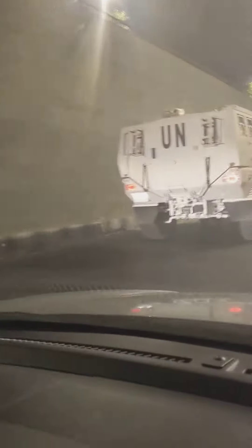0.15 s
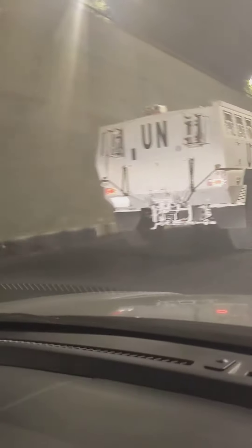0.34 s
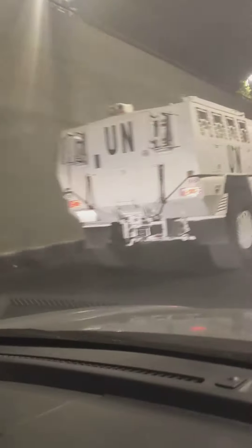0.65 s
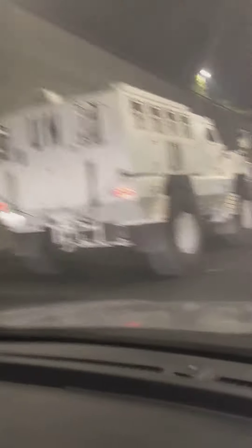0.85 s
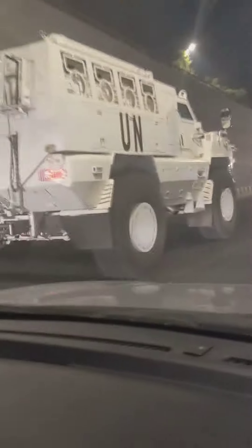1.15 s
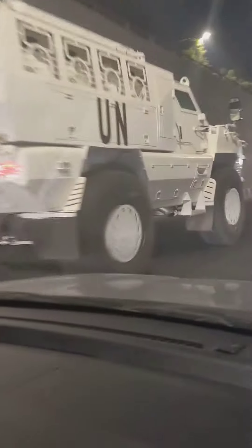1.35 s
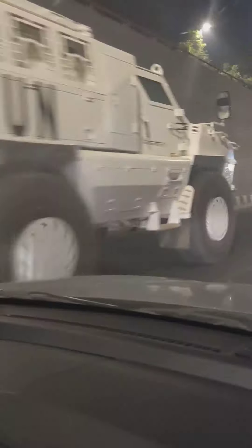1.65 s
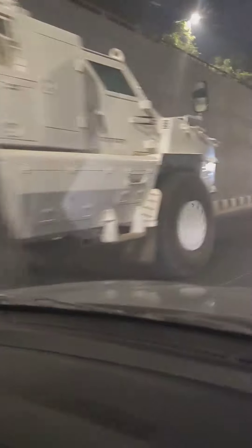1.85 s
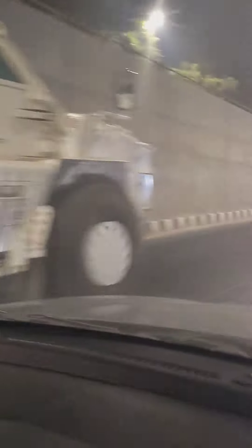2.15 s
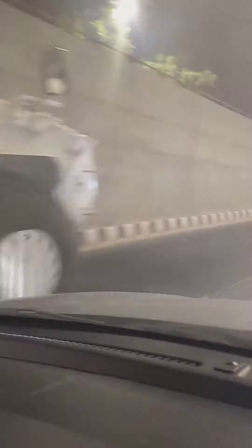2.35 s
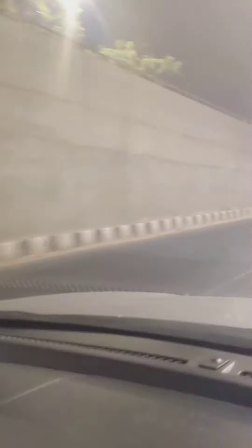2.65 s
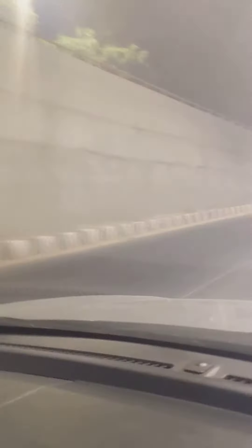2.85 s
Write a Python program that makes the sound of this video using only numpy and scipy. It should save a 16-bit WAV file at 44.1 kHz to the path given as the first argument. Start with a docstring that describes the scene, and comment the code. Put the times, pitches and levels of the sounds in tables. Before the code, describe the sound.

Inside a car at night, steady bass-heavy road and tyre noise with a faint rising engine hum; small camera clicks and rubs, soft thuds, then brief faint squeals beside an overtaken truck, louder in the right channel.

```python
"""A low rumble and a wavering cabin boom, under tyre roar and hiss, inside a car that overtakes a truck.
Shaped noise makes the rumble and tyres; wandering tones make the boom, shudder and rising engine hum.
Decaying sines make bumps thud. A hand on the camera clicks, knocks, rubs and rustles in bursts of noise.
Narrow noise makes the truck's falling hiss and thin sizzles; short tones squeal. The left port is weak."""
import sys
import numpy as np
from scipy.fft import rfft, irfft, next_fast_len
from scipy.io import wavfile
from scipy.ndimage import uniform_filter1d, map_coordinates

SR = 44100
rng = np.random.default_rng(int(sys.argv[2]) if len(sys.argv) > 2 else 0)


def pcm_store(signal):
    """Save signal as 16-bit PCM."""
    levels = np.round(np.clip(np.atleast_2d(signal), -1, 1) * 32767)
    wavfile.write(sys.argv[1], SR, levels.astype(np.int16).T)


N = 131859

# handling clicks: t/s, relative click level/dB, relative knock level/dB, click t60/s
CLICK_EVENTS = [(0.238,-51.5,-37.5,.025),(.2597,-46.5,-45,0.04),(0.2653,-54,-42,0.028),(0.2763,-48.5,-44,0.019),(0.3118,-57,-36.5,.025),(.3178,-38.5,-37.5,.025),(0.3228,-53.5,-37,0.034),(0.3588,-49,-39,.017),(0.859,-62.5,-44.5,.02),(0.8716,-61,-46,0.018),(0.8995,-67,-38.5,.028),(1.6217,-50,-41,0.014),(2.186,-63,-42,0.023),(2.2317,-57,-50,0.018),(2.2464,-45.5,-38.5,0.057),(2.278,-59,-38,.045),(2.762,-53.5,-57,.015),(2.8111,-48,-41,.029)]


def amp(db):
    """Decibels to gain."""
    return 10 ** (np.asarray(db) / 20)


def unit(x):
    """Scale to rms 1."""
    return x / np.sqrt(np.mean(x ** 2) + 1e-20)


def along(points, hz):
    """Read (f/Hz, value) points on a log frequency axis."""
    f, v = np.transpose(points)
    return np.interp(np.log(hz + 1), np.log(f + 1), v)


def curves(rows):
    """One value per sample for each column after the time."""
    s, *cols = np.transpose(rows)
    return [np.interp(np.arange(N) / SR, s, c) for c in cols]


def wobble(rate):
    """A smooth random curve, with rate knots a second."""
    knots = rng.standard_normal(int(N * rate / SR) + 4)
    return map_coordinates(knots, [np.arange(N) * rate / SR], mode="nearest")


def filtered(x, response):
    """Filter x by a complex response of frequency."""
    m = next_fast_len(N + SR // 2)
    hz = np.fft.rfftfreq(m, 1 / SR)
    return irfft(rfft(x, m) * response(hz), m)[..., :N]


def noise(spectrum):
    """Two unrelated noises of rms 1, rolled off around an octave above the last point of their spectrum."""
    m = next_fast_len(N + SR // 4)
    hz = np.fft.rfftfreq(m, 1 / SR)
    gain = amp(along(spectrum, hz)) / (1 + (hz / spectrum[-1][0] / 2) ** 10)
    shaped = irfft(rfft(rng.standard_normal((2, m))) * gain, m)[:, :N]
    return np.array([unit(n) for n in shaped])


def evened(x, span_s):
    """Noise with its slow chance swells taken out."""
    power = uniform_filter1d(x ** 2, max(int(span_s * SR), 2), axis=-1)
    return x / np.sqrt(np.abs(power) + 1e-9)


def burst(start, attack_s, t60):
    """A straight rise, then an exponential fall of 60 dB in t60 seconds."""
    t = np.arange(N) / SR - start
    return np.clip(t / attack_s, 0, 1) * 1000 ** (-np.maximum(t - attack_s, 0) / t60)


def swell(start, length):
    """A half-sine rise and fall."""
    t = np.arange(N) / SR
    return np.sin(np.pi * np.clip((t - start) / length, 0, 1))


def ringing(hz, wander_hz):
    """A resonance kept going: a tone of rms 1 that wanders in pitch and flutters in level."""
    flutter_db = 1.46
    phase = 2 * np.pi * np.cumsum(hz + wander_hz * wobble(16)) / SR
    return unit(np.sin(phase) * amp(flutter_db * wobble(16)))


def narrow(hz, width_hz):
    """A narrow band of noise around a centre that may move: two random curves on a carrier."""
    phase = 2 * np.pi * np.cumsum(hz * np.ones(N)) / SR
    return unit(wobble(2 * width_hz) * np.cos(phase) + wobble(2 * width_hz) * np.sin(phase))


def rumble():
    """The road shakes the body into a low, steady-grained noise."""
    # t/s, relative level/dB
    rumble_level = [(0,-28.5),(.4,-29),(.7,-31.5),(.85,-27),(2.0,-28),(2.99,-25.5)]
    # f/Hz, relative density/dB
    rumble_spectrum = [(15, -48.5), (24, -31.5), (30, -16), (38, -6), (48, 1.5), (59, -1), (68, -1),
                       (90, -4.5), (200, -59.5)]
    level_db, = curves(rumble_level)
    return amp(level_db + 0.5) * evened(noise(rumble_spectrum), span_s=0.13)


def cabin_boom():
    """The road pumps the cabin's lowest air resonance: a wandering tone in a bed of narrow noise."""
    # t/s, relative level/dB
    boom_level = [(0,-11),(.08,-22.5),(.14,-15),(.21,-22.5),(.26,-13.5),(.31,-22),(.36,-12.5),(.45,-14.5),(.54,-13.5),(.62,-18.5),(.69,-24),(.78,-22.5),(.93,-27.5),(1.06,-20.5),(1.31,-34),(1.41,-18),(1.52,-19.5),(1.66,-29.5),(1.83,-19),(1.94,-24.5),(2.07,-18),(2.18,-30.5),(2.52,-23.5),(2.99,-27)]
    # t/s, mean pitch f/Hz
    boom_pitch = [(0,78.14),(.2,79.5),(.32,75),(.6,75.63),(.8,80.33),(1.2,75.9),(1.9,79.46),(2.2,77),(2.6,83),(2.99,75.96)]
    # f/Hz, relative density/dB
    boom_spectrum = [(50, -43.5), (69, -0.5), (75, -5), (82, -2.5), (90, -10.5), (120, -53.5)]
    tone_db, bed_db, wander_hz = -3.5, -12, 1.6
    level_db, = curves(boom_level)
    pitch_hz, = curves(boom_pitch)
    boom = amp(bed_db) * evened(noise(boom_spectrum), span_s=0.04)
    boom[0] += amp(tone_db) * ringing(pitch_hz, wander_hz)
    return amp(level_db) * boom


def shudder():
    """The road shakes the body in a deep tone of drifting pitch and surging level."""
    # t/s, mean pitch f/Hz, relative level/dB
    shudder_path = [(0,60.1,-39.5),(.12,56.93,-17.5),(.22,58.01,-34),(.68,57.14,-31),(.84,57.82,-23),(1.0,60.8,-27.5),(1.2,58.96,-22),(1.32,54.95,-25.5),(1.48,52.18,-32.5),(1.66,50.23,-22),(1.78,54.64,-30.5),(1.9,58,-19.5),(2.0,55.2,-31.5),(2.3,57.01,-27.5),(2.45,59.83,-23.5),(2.6,59.33,-19.5),(2.74,61.3,-22),(2.81,56.6,-26.5),(2.88,56.6,-26.5),(2.99,60.3,-13.5)]
    pitch_hz, level_db = curves(shudder_path)
    return amp(level_db - 1) * ringing(pitch_hz, wander_hz=1.5)


def bumps():
    """Bumps in the road thud as decaying sines with a soft onset."""
    # t/s, relative level/dB, thud f/Hz, t60/s
    bump_events = [(.245,-20,146.3,.2),(.675,-26.5,149,.3),(1.548,-22,114.8,0.44),(1.998,-15,112.5,0.43),(2.228,-20,113.8,0.18),(2.494,-20,155.2,0.21),(2.68,-21,120.3,0.12)]
    attack_s = 0.019
    t = np.arange(N) / SR
    thuds = np.zeros(N)
    for start, db, f, t60 in bump_events:
        thuds += amp(db) * burst(start, attack_s, t60) * np.sin(2 * np.pi * f * (t - start))
    return thuds


def tyres():
    """Drone, roar and hiss in three noise bands; the road's texture shakes roar and hiss together."""
    # t/s, relative drone level/dB, relative roar level/dB, relative hiss level/dB
    tyre_levels = [(0,-19.5,-33.5,-45.5),(.15,-31,-33.5,-44.5),(.3,-25,-31.5,-44),(.55,-28.5,-37,-47),(1.0,-26,-37,-45.5),(1.5,-27,-35,-45.5),(1.85,-27,-37.5,-45),(2.08,-27.5,-35,-45.5),(2.22,-26.5,-31.5,-44.5),(2.4,-25.5,-34.5,-45.5),(2.55,-23,-32.5,-44.5),(2.8,-24.5,-33.5,-44.5),(2.95,-27,-36,-44)]
    # three spectra: f/Hz, relative density/dB
    drone_spectrum = [(60, -40), (90, 0.5), (112, 0), (135, 1), (153, -1.5), (178, -3.5), (215, -7),
                      (250, -13), (340, -50.5)]
    roar_spectrum = [(170, -25.5), (250, 0.5), (300, 1), (365, -4.5), (430, -3.5), (520, -10.5), (620, -14),
                     (760, -23.5), (1200, -54.5)]
    hiss_spectrum = [(400, -28), (680, 1.5), (800, 2), (950, 2), (1350, -3), (1650, -2.5), (2300, -9),
                     (3050, -13.5), (3600, -20), (4200, -20.5), (5000, -27.5), (6800, -28.5), (7600, -33),
                     (8400, -34.5), (11000, -42.5), (15500, -43.5)]
    drone_db, roar_db, hiss_db = curves(tyre_levels)
    texture = wobble(30.19)
    drone = amp(drone_db - 0.5) * evened(noise(drone_spectrum), span_s=0.36)
    # each band also has a slower tremble of its own
    roar = amp(roar_db + 0.96 * texture + 0.3 * wobble(12)) * noise(roar_spectrum)
    hiss = amp(hiss_db + 0.9 * texture + 0.35 * wobble(12)) * noise(hiss_spectrum)
    return drone + roar + hiss


def engine():
    """A slightly unsteady hum on harmonics of the firing rate, which climbs as the car gathers speed."""
    # t/s, mean firing rate f/Hz, relative level/dB
    engine_path = [(0, 63.3, -43), (.5, 64.62, -33), (1.1, 66.55, -32.5), (1.85, 68.46, -34),
                   (2.4, 68.98, -36.5), (3, 70.1, -38)]
    # multiple of the firing rate, mean relative level/dB
    engine_orders = [(2, -9.5), (3, -1)]
    rate_hz, level_db = curves(engine_path)
    phase = 2 * np.pi * np.cumsum(rate_hz + 0.14 * wobble(10)) / SR
    hum = np.zeros(N)
    for order, db in engine_orders:
        hum += amp(db + 2.4 * wobble(11)) * unit(np.sin(round(order) * phase))
    return amp(level_db) * hum


def rubs_and_rustles():
    """Fingers rub and the grip rustles: bursts and swells of grainy treble noise."""
    # rubs: start t/s, relative level/dB, attack/s, t60/s
    rub_events = [(.292,-53,.015,0.14),(.46,-65,.06,.5),(.816,-54,0.01,.2),(1.168,-59,.01,.23),(1.686,-55,0.012,0.16)]
    # rustles: centre t/s, half length/s (the spread of a bell curve), relative level/dB
    rustle_events = [(0.198, 0.05, -61), (0.864, .015, -60), (1.459, 0.13, -66.5), (2.485, 0.2, -68.5),
                     (2.739, 0.049, -63.5)]
    # two spectra: f/Hz, relative density/dB
    rub_spectrum = [(1000, -26), (4000, -16), (6000, -3.5), (6900, 0.5), (7600, -8.5), (8400, -6),
                    (9500, -15.5), (15500, -28.5)]
    rustle_spectrum = [(2000, -9.5), (6500, -1.5), (10000, -6.5), (15500, -9)]
    t = np.arange(N) / SR
    rubs = sum(amp(db) * burst(s, attack, t60) for s, db, attack, t60 in rub_events)
    rustles = sum(amp(db) * np.exp(-((t - s) / width) ** 2 / 2) for s, width, db in rustle_events)
    grain = unit(amp(2.1 * wobble(250)))
    return grain * (rubs * noise(rub_spectrum) + rustles * noise(rustle_spectrum))


def knocks():
    """The camera's case knocks hollowly: short noise that swells up to each click, then dies."""
    # f/Hz, relative density/dB
    knock_spectrum = [(150,-11.5),(400,2),(700,-5.5),(920,4),(1220,1.5),(1620,7.5),(1900,-2.5),(2600,-12),(4000,-20.5),(7000,-42.5)]
    trim_db, attack_s, t60_s = 5.5, 0.007, 0.05
    envelope = sum(amp(db + trim_db) * burst(s - attack_s, attack_s, t60_s) for s, _, db, _ in CLICK_EVENTS)
    return envelope * noise(knock_spectrum)


def clicks():
    """The camera's case clicks under the fingers: a sharp crack of noise over a longer tail."""
    # f/Hz, relative density/dB
    click_spectrum = [(100, -10.5), (400, -5), (1000, -3.5), (1650, 0), (3000, -13.5), (4500, -6),
                      (6800, -6), (10000, -12.5), (15500, -21.5)]
    trim_db, attack_s = -1, 0.0009
    crack_db, crack_t60_s = 1.5, 0.008
    envelope = np.zeros(N)
    for start, db, _, t60 in CLICK_EVENTS:
        tail = burst(start, attack_s, t60)
        crack = amp(crack_db) * burst(start, attack_s, crack_t60_s)
        envelope += amp(db + trim_db) * (tail + crack)
    return envelope * noise(click_spectrum)


def truck_hiss():
    """A faint narrow hiss that falls in pitch as the truck goes by."""
    # t/s, centre f/Hz, relative level/dB
    truck_path = [(.6,4615,-87),(1.0,4470,-72),(1.55,4230,-63.5),(1.9,3763,-64.5),(2.03,3450,-57),(2.3,3078,-54),(2.6,2948,-58.5),(2.99,2810,-59)]
    centre_hz, level_db = curves(truck_path)
    return amp(level_db) * narrow(centre_hz, width_hz=340)


def sizzles():
    """Faint thin sizzles: short swells of narrow noise at fixed pitches."""
    # start t/s, length/s, centre f/Hz, relative level/dB
    sizzle_events = [(.41,.16,8200,-66.5),(.814,0.034,8270,-60),(1.163,.13,8170,-69.5),(1.781,.19,8150,-71),(2.35,.19,8830,-75),(2.882,0.13,6720,-65)]
    return sum(amp(db) * swell(s, length) * narrow(f, width_hz=360) for s, length, f, db in sizzle_events)


def squeals():
    """Short squeals beside the truck: wandering tones that swell and fade."""
    # start t/s, length/s, mean pitch f/Hz, relative level/dB
    squeal_events = [(1.975,0.076,3583,-58),(2.275,0.067,3070,-55),(2.32,.09,4008,-63.5)]
    return sum(amp(db) * swell(s, length) * ringing(f, wander_hz=25) for s, length, f, db in squeal_events)


def ports(field):
    """The cabin's sound at two ports: alike in the bass, unrelated in the treble, weak on the left."""
    # f/Hz, left minus right level/dB
    balance = [(40, -13.5), (130, -10), (220, -16), (370, -17.5), (480, -10), (620, -8.5), (800, -15),
               (1050, -16), (1400, -23), (2200, -21.5), (3700, -11.5), (8000, -7), (13000, -1.5)]
    # f/Hz, likeness of the ports (1 = alike, 0 = unrelated)
    likeness = [(60, .99), (220, .98), (290, .91), (370, .72), (480, .33), (650, .1), (3000, 0)]
    # f/Hz, phase by which left leads/rad
    phase_lead = [(30, -0.52), (90, -0.28), (180, -.9), (300, -1)]

    def mid_side_gains(hz):
        turn = np.arccos(np.clip(along(likeness, hz), -1, 1)) / 2
        return np.array([np.cos(turn), np.sin(turn)])

    def left_response(hz):
        return amp(along(balance, hz)) * np.exp(1j * along(phase_lead, hz))

    mid, side = filtered(field, mid_side_gains)
    left = filtered(mid + side, left_response)
    return amp(5.0) * np.array([left, mid - side])


def scene():
    """The cabin's noise at the ports, plus the hand and faint high sounds, far weaker on the left."""
    cabin = rumble() + cabin_boom() + tyres()
    # these tones join the part that both ports share
    cabin[0] += shudder() + bumps() + engine()
    hand = rubs_and_rustles() + knocks() + clicks()
    airy = truck_hiss() + sizzles() + squeals()
    left_db, right_db = -26, 0
    return ports(cabin) + (hand + airy) * amp([[left_db], [right_db]])


def record(dry):
    """The camera keeps nothing above its band limit."""
    top_hz = 15830
    return filtered(dry, lambda hz: hz < top_hz)


dry = scene()
out = record(dry)
pcm_store(out)
```